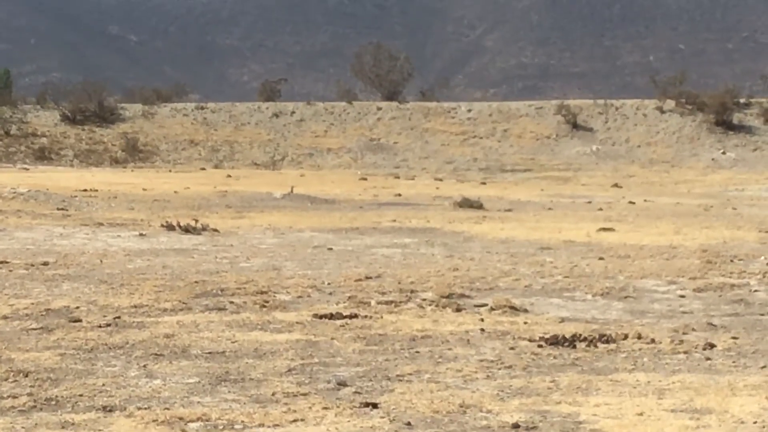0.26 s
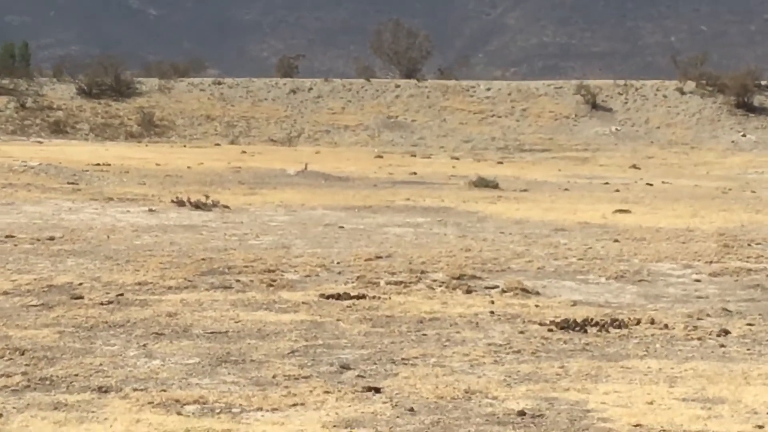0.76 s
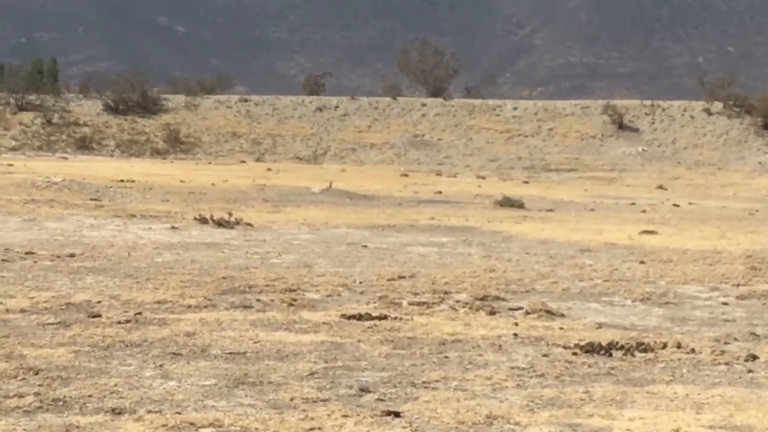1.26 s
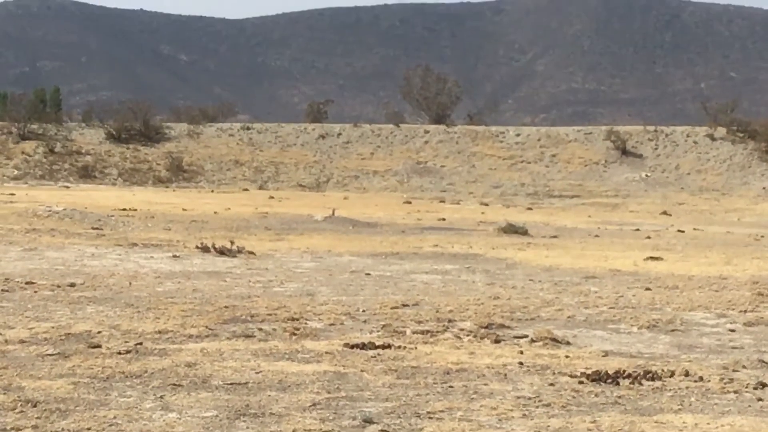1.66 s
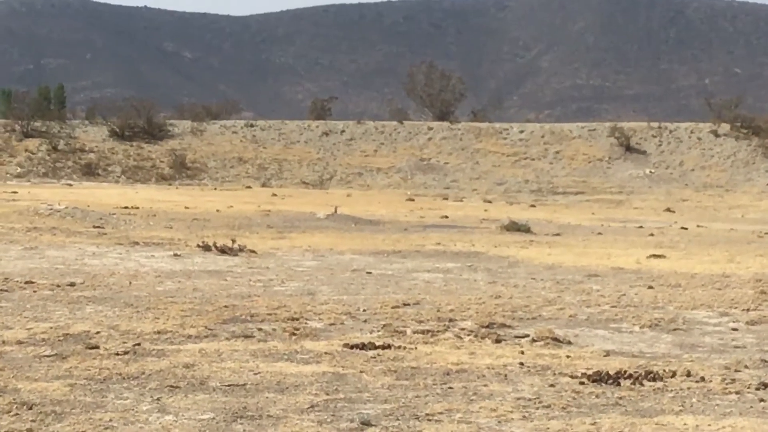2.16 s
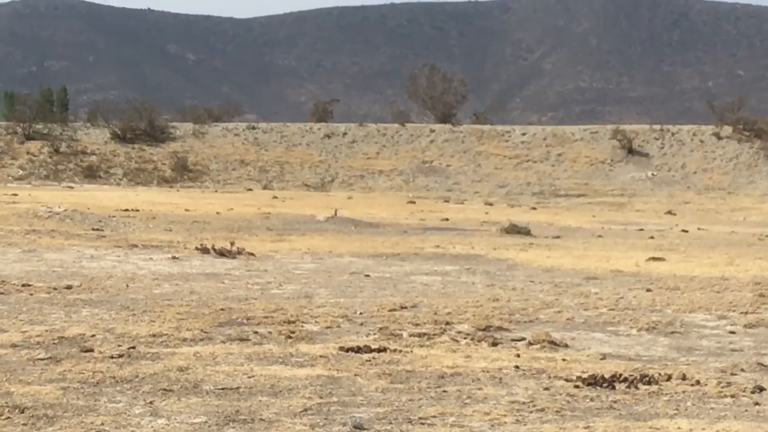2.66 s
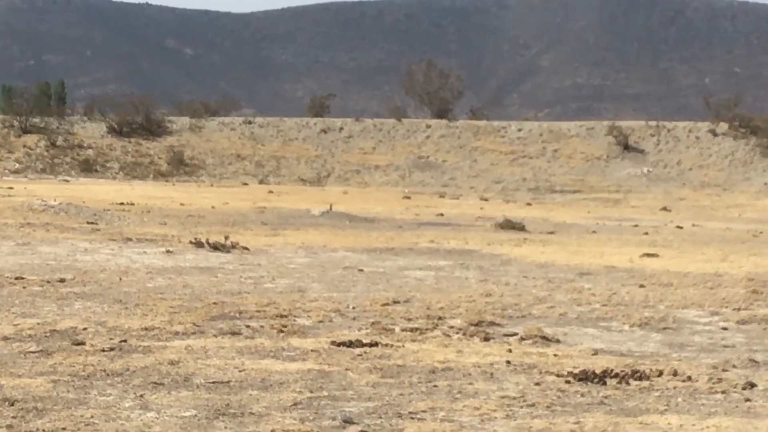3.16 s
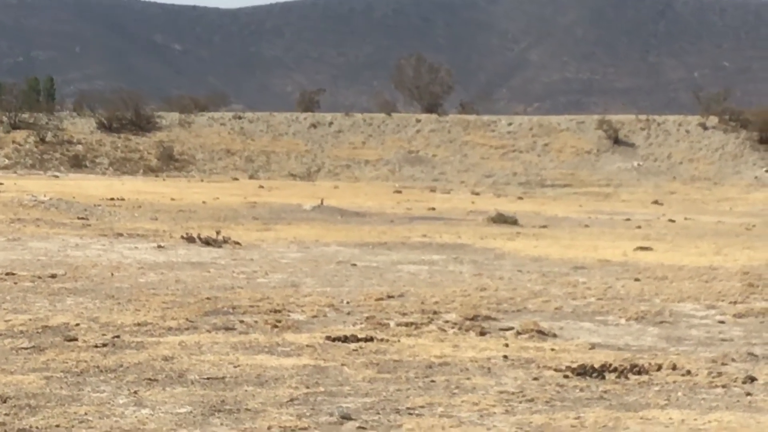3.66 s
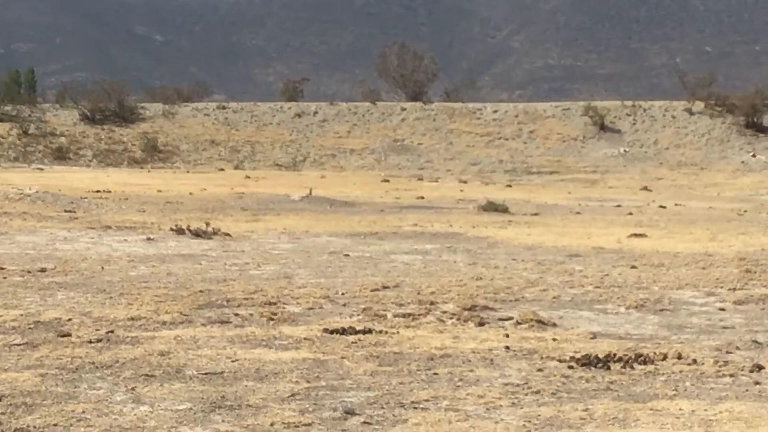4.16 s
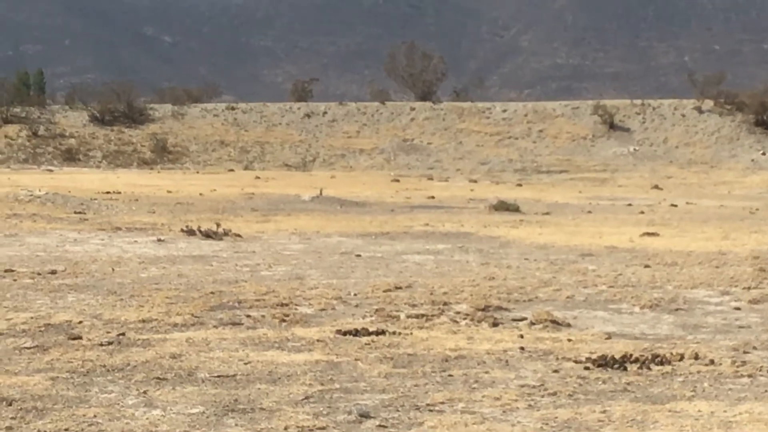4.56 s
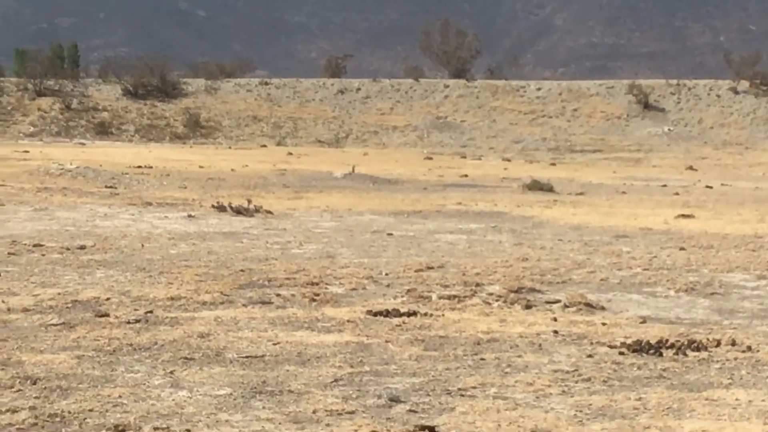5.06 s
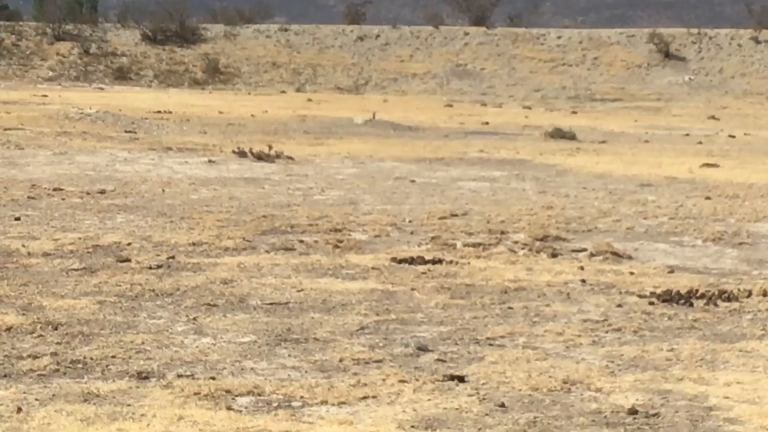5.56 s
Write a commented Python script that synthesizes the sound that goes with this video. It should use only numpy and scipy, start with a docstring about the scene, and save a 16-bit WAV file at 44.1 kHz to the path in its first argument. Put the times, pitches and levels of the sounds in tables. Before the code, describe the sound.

Sharp, squeaky prairie dog chirps repeat about every half second in open dry grassland, with wind buffeting and handling noise close by.

```python
"""Wind buffets a hand-held microphone over a faint hiss: shaped noise, swelling with breeze and short eddies.
From the start fingers and clothes rub it, as filtered random grains; early and late a fingertip squeaks.
From a third of a second on, a distant prairie dog barks eleven times, mostly half a second apart: short
arched chirps, each a stack of clean partials with a second, beating tone above every partial, and echoes.
Ticks on the casing, noise cracks with short rings, fall among the barks and outlast the final one."""
import sys
import numpy as np
from scipy import signal
from scipy.fft import rfft, irfft
from scipy.io import wavfile
from scipy.ndimage import uniform_filter1d

SR = 44100
rng = np.random.default_rng(int(sys.argv[2]) if len(sys.argv) > 2 else 0)


def transcribe(u):
    """Save the signal u as a 16-bit wav file named by the first command-line argument.

    u: samples, shape (n,) or (channels, n), limited to [-1, 1]; the rate is SR.
    q: integer samples, one column per channel.
    """
    v = np.clip(np.atleast_2d(u).T, -1, 1)
    q = np.round(v * 32767).astype(np.int16)
    wavfile.write(sys.argv[1], SR, q)


N = 257103   # samples
TIME = np.arange(N) / SR   # s


def from_db(db):
    """Decibels to an amplitude factor."""
    return 10 ** (np.asarray(db) / 20)


def rms_one(x):
    """x scaled to an RMS of 1."""
    return x / np.sqrt(np.mean(x ** 2) + 1e-20)


def in_time(rows, at):
    """Columns of a table, read along its first column with straight lines between rows."""
    first, *columns = np.transpose(rows)
    return [np.interp(at, first, column) for column in columns]


def coloured(x, spectrum):
    """x through a (frequency [Hz], level [dB]) curve, interpolated on a log frequency axis."""
    hz, db = np.transpose(spectrum)
    grid_hz = np.maximum(np.arange(N // 2 + 1) * SR / N, 1)
    gain = from_db(np.interp(np.log(grid_hz), np.log(hz), db))
    return irfft(rfft(x) * gain, N)


def above(x, hz):
    """Fourth-order high-pass."""
    return signal.sosfilt(signal.butter(4, hz, "high", fs=SR, output="sos"), x)


def drift(rate_hz, size=N):
    """Random wandering of RMS 1: noise through two equal one-pole low-passes at rate_hz."""
    r = np.exp(-2 * np.pi * rate_hz / SR)
    noise = rng.standard_normal(size + 4000)
    return rms_one(signal.lfilter([1], [1, -2 * r, r * r], noise)[4000:])   # drop the run-in


def ring(x, hz, t60):
    """Damped resonator: a unit click starts a sine of height 1 that falls 60 dB in t60 seconds."""
    r = from_db(-60 / (t60 * SR))
    w = 2 * np.pi * hz / SR
    return signal.lfilter([0, np.sin(w)], [1, -2 * r * np.cos(w), r * r], x + 1e-18)


def burst(start, length):
    """A broad, rounded envelope of height 1."""
    return np.sin(np.pi * np.clip((TIME - start) / length, 0, 1)) ** .6


def air():
    """Faint steady hiss: shaped noise whose level wavers slowly."""
    # hiss colour: (frequency [Hz], level [dB])
    air_colour = [(76, -26), (130, -5), (202, -2), (452, -17), (859, -17), (1180, -20), (1700, -18.5),
                  (2120, -27), (2920, -27.5), (4830, -32), (10400, -27), (11900, -27), (15800, -31.5)]
    level = from_db(-60 + 1.2 * drift(2.1))
    return level * rms_one(coloured(rng.standard_normal(N), air_colour))


def wind():
    """Low lumps of pressure: rumble, its own beating evened out, swelling with breeze and eddies."""
    # breeze on the microphone, between the thumps: (time [s], level [dB])
    breeze_levels = [(0, -52.5), (.3, -47.5), (.5, -48.5), (.9, -49), (1.1, -45), (1.55, -56), (1.8, -42.5),
                     (1.92, -53), (2.15, -45), (2.45, -50), (2.8, -55), (3.2, -49), (3.9, -50.5),
                     (4.3, -48), (4.5, -53), (4.75, -48.5), (5.07, -52), (5.83, -47.5)]
    # rumble colour: (frequency [Hz], level [dB])
    rumble_colour = [(13, -33), (22, 8.5), (42, 5), (59, 7), (93, 0), (178, -22.5), (300, -35.5),
                     (390, -68), (660, -120)]
    # eddies that thump the microphone: (middle [s], length [s], level [dB])
    thumps = [(0.04, 0.054, -44.5), (0.46, 0.089, -41.5), (0.527, 0.044, -30), (0.645, 0.055, -33),
              (.71, 0.14, -46), (0.792, 0.081, -40), (0.877, 0.071, -38.5), (1.012, 0.07, -46),
              (1.398, 0.062, -30), (1.76, 0.075, -38), (1.84, 0.068, -47), (1.979, 0.042, -26),
              (2.098, 0.039, -45), (2.202, 0.087, -44), (2.297, 0.055, -38), (2.40, 0.11, -44.5),
              (2.596, 0.064, -35.5), (2.666, 0.088, -47), (3.047, 0.034, -51), (3.301, 0.073, -37),
              (3.363, 0.027, -31.5), (4.26, 0.064, -41.5), (4.352, 0.095, -46.5), (4.59, 0.081, -47),
              (4.717, 0.03, -44)]
    waver_db, waver_hz = 1.5, 6.9
    rumble = rms_one(coloured(rng.standard_normal(N), rumble_colour))
    beating = np.sqrt(uniform_filter1d(rumble ** 2, size=1200))
    steadied = rms_one(rumble / (beating + 0.74))
    breeze = from_db(in_time(breeze_levels, TIME)[0] + waver_db * drift(waver_hz))
    eddies = sum(from_db(db) * burst(middle - length / 2, length) ** 2 for middle, length, db in thumps)
    return (breeze + eddies) * steadied


def rustle():
    """Dense uneven grains of rubbing; scuffs add to the low and treble parts in their own proportions."""
    # fingers and clothes, light rubbing: (time [s], level [dB])
    rub_levels = [(.05, -64.5), (.18, -59), (.42, -73), (.55, -61), (.98, -58), (1.25, -63.5), (1.4, -56),
                  (1.7, -69.5), (1.88, -57), (2.1, -64), (2.6, -62), (2.87, -82), (3.1, -64.5), (3.3, -65),
                  (3.68, -55), (4.05, -68), (4.4, -63.5), (4.65, -59), (4.92, -57), (5.03, -71.5),
                  (5.35, -64.5), (5.66, -55.5), (5.83, -59)]
    # rubbing colour: (frequency [Hz], level [dB])
    rub_colour = [(150, -36), (250, -0.5), (396, -2), (481, -1.5), (784, -2), (1230, 1.5), (3900, -19),
                  (7000, -41), (9100, -87), (15400, -120)]
    # firm scuffs: (start [s], length [s], level [dB], treble over that level [dB])
    scuffs = [(0.095, 0.054, -65.5, 21), (0.135, 0.049, -54.5, 11), (0.46, 0.089, -52, -1),
              (0.543, 0.025, -74, -6), (1.317, 0.1, -54.5, 1), (1.388, 0.062, -62, -3),
              (1.801, 0.054, -46.5, 0.5), (3.583, 0.088, -55.5, 6), (4.203, 0.025, -54.5, 7),
              (4.482, 0.12, -57, 3), (4.518, 0.066, -54.5, 3.5), (4.892, 0.025, -75, 23.5),
              (5.13, 0.058, -55.5, 11), (5.167, 0.051, -52.5, 11.5), (5.482, 0.064, -58.5, 2),
              (5.539, 0.054, -51.5, 3)]
    rub_treble_db = 0.9
    sizes = from_db(2.5 * np.minimum(rng.exponential(1, N), 4)) * rng.choice([-1, 1], N)
    grains_per_s = 1800 * from_db(5 * drift(45))   # bunched unevenly
    grains = sizes * (rng.random(N) < grains_per_s / SR)
    rub = rms_one(coloured(grains, rub_colour))
    treble = above(rub, 1600)
    level_db, = in_time(rub_levels, TIME)
    low_gain, treble_gain = from_db(level_db), from_db(level_db + rub_treble_db)
    for start, length, db, bright_db in scuffs:
        stroke = burst(start, length)
        low_gain = low_gain + from_db(db) * stroke
        treble_gain = treble_gain + from_db(db + bright_db) * stroke
    return low_gain * (rub - treble) + treble_gain * treble


def slips():
    """Short rough squeaks, noise through a sharp resonance, and swishes of high hiss."""
    # a fingertip slips: (start [s], length [s], frequency [Hz], level [dB])
    squeaks = [(.104, .026, 1400, -50), (5.136, .03, 2380, -48)]
    # bright swishes: (start [s], length [s], level [dB])
    swishes = [(1.797, 0.051, -57), (1.68, 0.27, -65.5)]
    out = np.zeros(N)
    for start, length, hz, db in squeaks:
        squeal = rms_one(ring(rng.standard_normal(N), hz, .02))
        out += from_db(db) * burst(start, length) * squeal
    swell = sum(from_db(db) * burst(start, length) for start, length, db in swishes)
    return out + swell * rms_one(above(rng.standard_normal(N), 9000))


def ticks():
    """Each tick is a sharp crack and a few cycles of ringing; faint ones fall at random."""
    # ticks on the casing: (time [s], level [dB], ring frequency [Hz], crack relative to that level [dB])
    casing_ticks = [(0.544, -43, 1200, -14), (.570, -45.5, 3480, 6), (0.893, -43, 328, 0.5),
                    (0.949, -37.5, 286, -8), (1.318, -46, 403, 1), (1.752, -54, 9000, -1),
                    (1.775, -30, 890, -5.5), (2.1113, -37.5, 980, -11), (3.052, -48, 400, -8),
                    (3.493, -36, 284, -7), (3.58, -44, 670, -12), (3.647, -50, 1070, 3),
                    (3.708, -37.5, 1500, -14), (3.715, -32, 1170, -23), (3.739, -47, 2600, -4),
                    (3.780, -51, 2510, -6), (3.786, -48, 1110, -9), (4.1095, -41, 1240, -13),
                    (4.225, -41.5, 1600, -18), (4.488, -43.5, 590, -6), (4.68, -44, 960, -31),
                    (4.701, -37, 1210, -23), (4.727, -32.5, 1100, -32), (4.741, -40, 960, -30),
                    (4.759, -38, 1290, -25), (4.955, -43.5, 1290, -18), (5.042, -36, 750, 1),
                    (5.086, -44.5, 1190, -12), (5.445, -38, 294, -12), (5.539, -37, 760, -14),
                    (5.561, -34.5, 1140, -14), (5.581, -48, 9000, -4), (5.638, -35, 1250, -6)]
    faint_count, faint_top_db, faint_spread_db, faint_crack_db = 70, -53, 2, -20
    faint_low_hz, faint_high_hz = 865, 3200
    size = 900   # samples per tick
    faint_ticks = []
    for when, weakness, where in rng.random((faint_count, 3)):
        db = faint_top_db + faint_spread_db * np.log(1 - .9 * weakness)
        hz = faint_low_hz * (faint_high_hz / faint_low_hz) ** where
        faint_ticks.append((when * N / SR, db, hz, faint_crack_db))
    out, strike = np.zeros(N + size), np.eye(1, size)[0]   # strike: a unit click
    for s, db, hz, crack_db in [*casing_ticks, *faint_ticks]:
        i = int(s * SR)
        crack = rng.standard_normal(size) * np.exp(-np.arange(size) / (.00035 * SR))
        crack = signal.lfilter([.6], [1, -.6], crack)   # duller towards the top
        ringing = 1.17 * ring(strike, hz, 8.4 / hz)   # 60 dB down after 8.4 cycles
        out[i:i + size] += from_db(db) * (ringing + from_db(crack_db) * crack)
    return out[:N]


def bark_pitch(phase, top_hz, top_at, rise):
    """Arched glide in Hz: the voice catches on its low pitch, jumps up, then sags and falls away."""
    catch_share, rise_bend, climb_share = 0.0693, 4.5, .35   # climb: the slow, rounded part of the rise
    sag_share, fall_share, fall_bend = 0.05, .11, 5.04
    tail_fall = 0.67   # share of pitch lost per length after the end
    before = np.clip((top_at - phase) / (top_at - catch_share), 0, 1)
    after = np.clip((phase - top_at) / (1 - top_at), 0, 1)
    under = rise * ((1 - climb_share) * before ** rise_bend + climb_share * before ** 1.5)
    pitch = top_hz * (1 - under - sag_share * after - fall_share * after ** fall_bend)
    return uniform_filter1d(pitch * (1 - tail_fall * np.clip(phase - 1, 0, .5)), size=120)


def bark_effort(phase, swell_depth):
    """Vocal effort in dB over one bark; swell_depth scales it while the bark swells in."""
    # one bark, 0 start, 1 end: (share of length, effort before swell-in [dB])
    arch = [(-.012, -39), (0, -13), (.08, -11), (.2, -3), (.6, 2.8), (.86, -0.5), (1.0, -11), (1.1, -18),
            (1.3, -38.5)]
    swell_share = .55   # share of the length over which a bark swells in
    effort_db = uniform_filter1d(in_time(arch, phase)[0], size=30)
    return effort_db * np.where((phase > 0) & (phase < swell_share), swell_depth, 1)


def scatter(x):
    """Grass and scrub send back a short smear: the sound convolved with a dying noise."""
    level_db, time_constant_s = -21, 0.013
    tail = rng.standard_normal(4000) * np.exp(-np.arange(4000) / (time_constant_s * SR))
    return from_db(level_db) * signal.fftconvolve(x, tail / np.sqrt(np.sum(tail ** 2)))[:N]


def surroundings(x):
    """Delayed copies and scatter of the bark, coloured together."""
    # echoes off mounds and ground: (delay [s], level before colour [dB])
    echo_list = [(0.023, -21), (0.035, -27), (.070, -39)]
    # colour of all that returns: (frequency [Hz], level [dB])
    echo_colour = [(1500, -7), (4500, -6), (6700, -14.5), (9000, 5), (12000, -8)]
    echoes = sum(from_db(db) * np.roll(x, int(lag * SR)) for lag, db in echo_list)
    return coloured(echoes + scatter(x), echo_colour)


def barks():
    """Clean partials on an arched pitch; a second vibration in the throat beats against each of them."""
    # barks: (start [s], length [s], top pitch [Hz], top position [share of length],
    # start under the top [share of pitch], level before effort and mouth [dB], second partial over the
    # first [dB], third over the first [dB], treble as the head turns [dB], beat rate [Hz],
    # beat tone before share and effort [dB], depth of swell-in [factor on effort])
    bark_list = [(.3260, 0.054, 2336, 0.28, 0.13, -48, 3.5, -1, -3, 390, -9.5, 1.03),
                 (1.0419, 0.029, 2224, 0.59, .11, -50.5, -0.5, 8.5, 5, 358, -7.5, 0.085),
                 (1.5231, 0.041, 2245, 0.56, 0.18, -47.5, 3, 4.5, 1.5, 392, -5, 1.15),
                 (2.0528, 0.046, 2256, 0.63, 0.13, -48, 0, 1.5, -4.5, 391, -7, 1.1),
                 (2.5409, 0.046, 2287, 0.59, 0.25, -49.5, -3, -12, -8.5, 399, -6, 1.2),
                 (3.0614, 0.044, 2267, 0.55, 0.16, -48, 0, 1.5, -4.5, 347, -8, 1.3),
                 (3.5544, 0.044, 2288, 0.56, 0.17, -48.5, 4, 5.5, 3, 336, -14, 1.36),
                 (4.1121, 0.039, 2237, 0.6, 0.15, -49, 2, 9, 7, 333, -6.5, 1.24),
                 (4.591, 0.04, 2230, 0.67, 0.17, -51.5, 3, 4.5, 4, 346, -6, 1.2),
                 (5.0251, 0.041, 2210, 0.73, 0.12, -47.5, -0.5, 1.5, -3, 350, -7, 1.35),
                 (5.5248, 0.04, 2180, 0.71, .135, -52, 1, 4.5, 3.5, 356, -2, 1.05)]
    # partials 4 to 6 over the first, before head turn: (level [dB])
    upper_partials_db = [-4, -10.5, -27.5]
    # how steeply each partial follows effort: (slope [dB per dB])
    effort_slope = [0.75, 0.83, 1.05, 0.75, 0.55, 0.35]
    # beat tone above each partial, on top of the bark's own beat level: (level [dB])
    beat_share_db = [-8, -3, 3, 0, -3, -8]
    # throat and mouth favour some pitches as the partials glide past: (frequency [Hz], level [dB])
    mouth = [(1900, -12.5), (2080, -0.5), (3500, -3.5), (4700, 0), (5700, 2), (6500, 0.5), (7500, -5),
             (8300, 1.5), (9700, -6), (10100, -1), (10700, 0.5)]
    lower_beat_db, breathy_db, skirt_db = -16.5, -29, -24
    shimmer_db, shimmer_hz = .8, 120   # each partial wavers in strength, more so high up
    out = np.zeros(N)
    breath = rms_one(above(rng.standard_normal(N), 4800))
    for (start, length, top_hz, top_at, rise, level_db, second_db, third_db, treble_db,
         beat_hz, beat_db, swell_depth) in bark_list:
        partials_db = level_db + np.r_[0, second_db, third_db, np.add(upper_partials_db, treble_db)]
        part = slice(int((start - .01) * SR), int((start + .08) * SR))
        t = TIME[part] - start
        phase = t / length
        pitch = bark_pitch(phase, top_hz, top_at, rise)
        effort_db = bark_effort(phase, swell_depth)
        turn = 2 * np.pi * np.cumsum(pitch * (1 + .004 * drift(250, len(t)))) / SR
        beat = 2 * np.pi * np.cumsum(beat_hz * (1 + .03 * drift(60, len(t)))) / SR
        for k, db in enumerate(partials_db):
            # the beat is deepest while the voice is weak
            upper = from_db(beat_db + beat_share_db[k] - 0.52 * np.maximum(effort_db, -9))
            sides = upper * (np.exp(1j * beat) + from_db(lower_beat_db) * np.exp(-1j * beat))
            # uneven cycles smear a skirt around each line, more so high up
            skirt = from_db(skirt_db + 5.0 * k) * drift(1000, len(t))
            shimmer = shimmer_db * np.sqrt(k + 1) * drift(shimmer_hz, len(t))
            colour_db = in_time(mouth, (k + 1) * pitch)[0] + shimmer
            tone = np.real((1 + sides + skirt) * np.exp(1j * (k + 1) * turn))
            out[part] += np.sqrt(2) * from_db(db + effort_slope[k] * effort_db + colour_db) * tone
        out[part] += from_db(max(partials_db) + breathy_db + 0.46 * effort_db) * breath[part]
    return out + surroundings(out)


def scene():
    """All sources summed at one microphone."""
    return (air() + wind() + rustle() + slips() + ticks() + barks())[None]


def record(dry):
    """Cavities at the port dip the treble; the lowest rumble and the top are cut."""
    # microphone dips: (frequency [Hz], width [Hz], level [dB])
    port_dips = [(5170, 370, -3), (7690, 1800, -6.5), (10360, 1460, -7)]
    out = above(dry, 37.3)
    for hz, width_hz, db in port_dips:
        band = signal.lfilter(*signal.iirpeak(hz, hz / width_hz, fs=SR), out)
        out = out + (from_db(db) - 1) * band
    return signal.sosfilt(signal.ellip(10, .5, 60, 15780, fs=SR, output="sos"), out)   # steep low-pass


dry = scene()
out = record(dry)
transcribe(out)
```